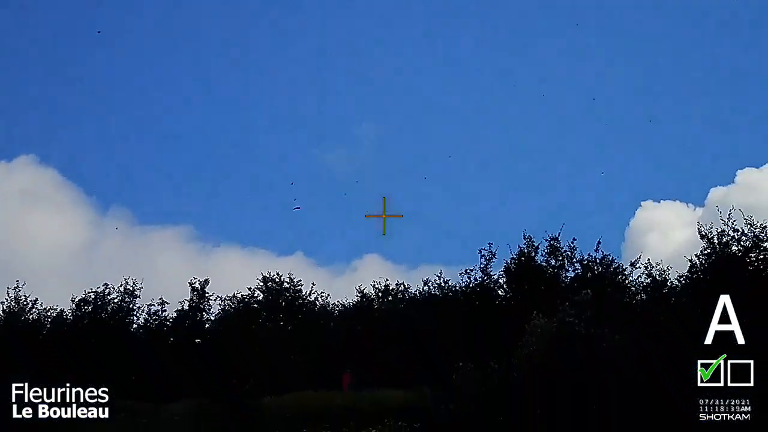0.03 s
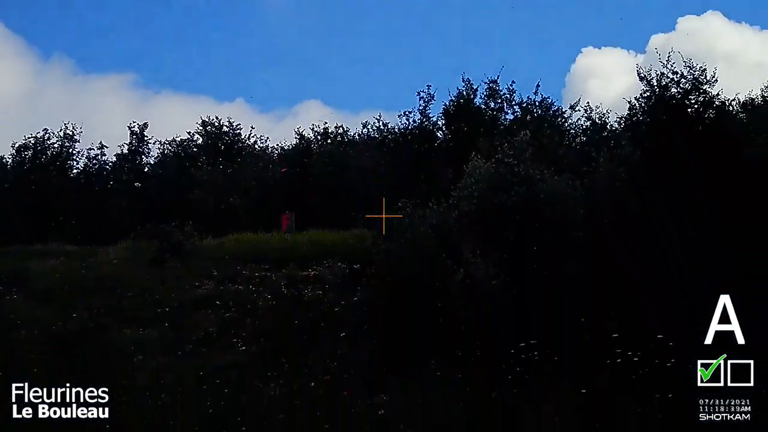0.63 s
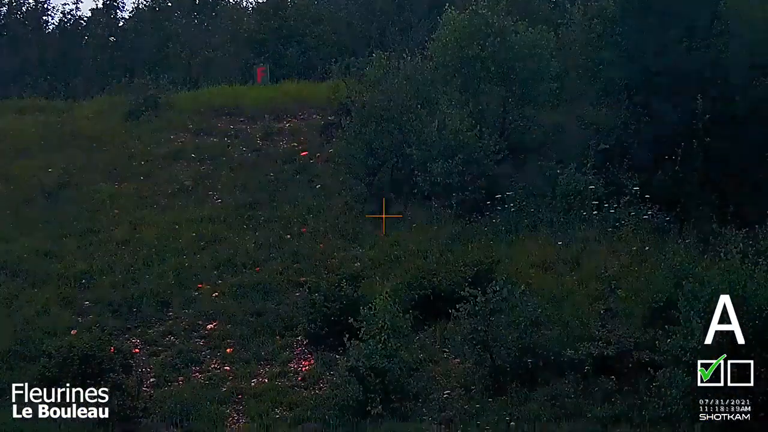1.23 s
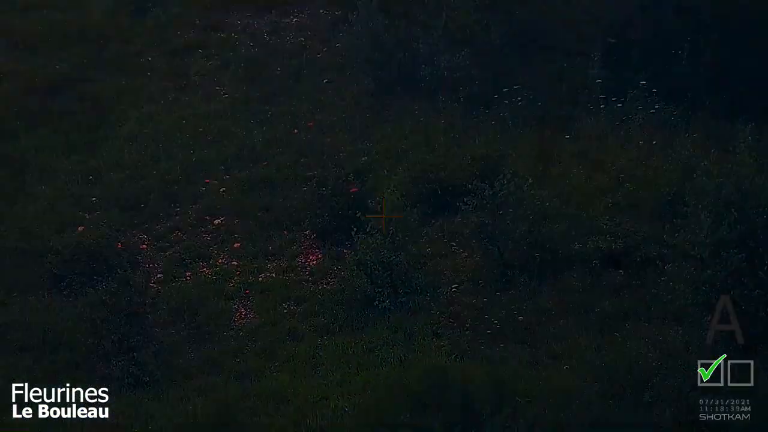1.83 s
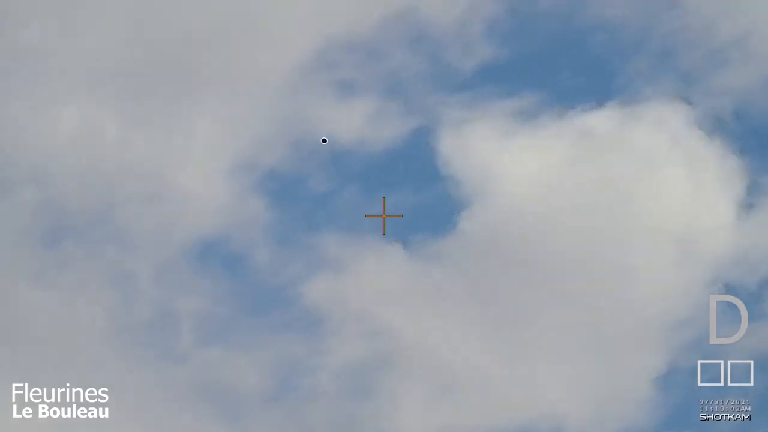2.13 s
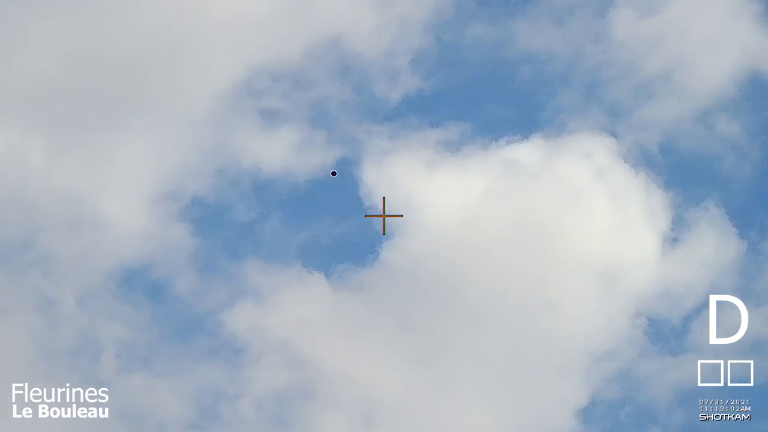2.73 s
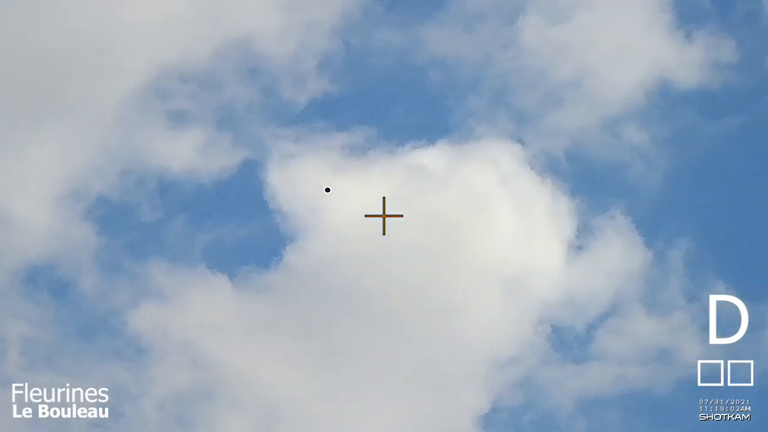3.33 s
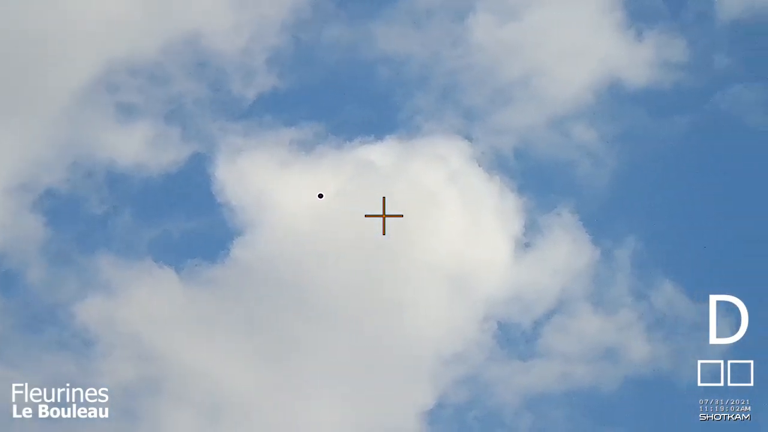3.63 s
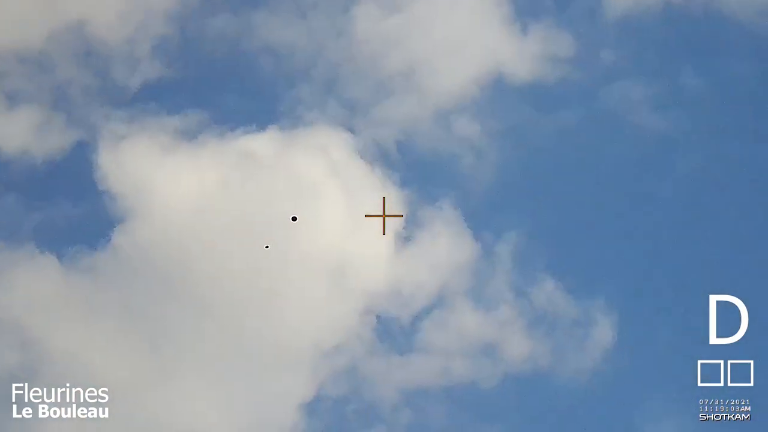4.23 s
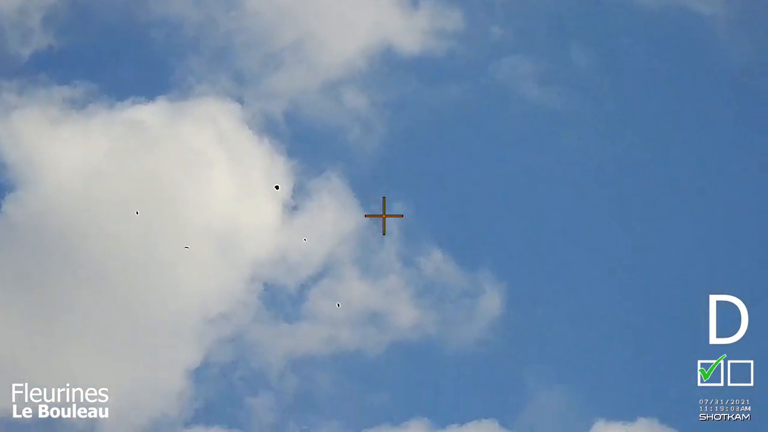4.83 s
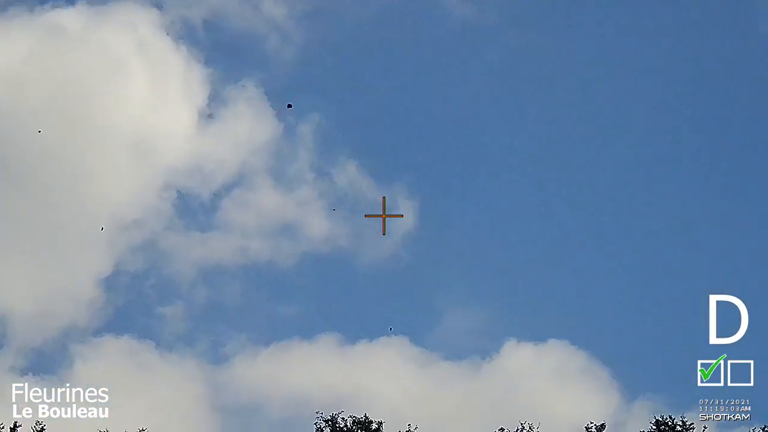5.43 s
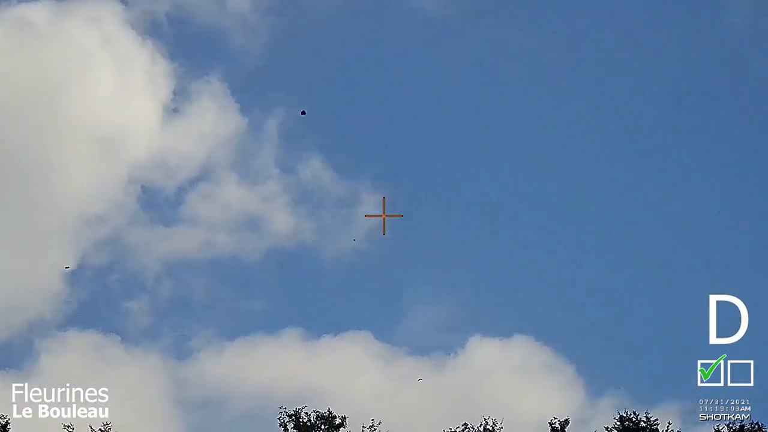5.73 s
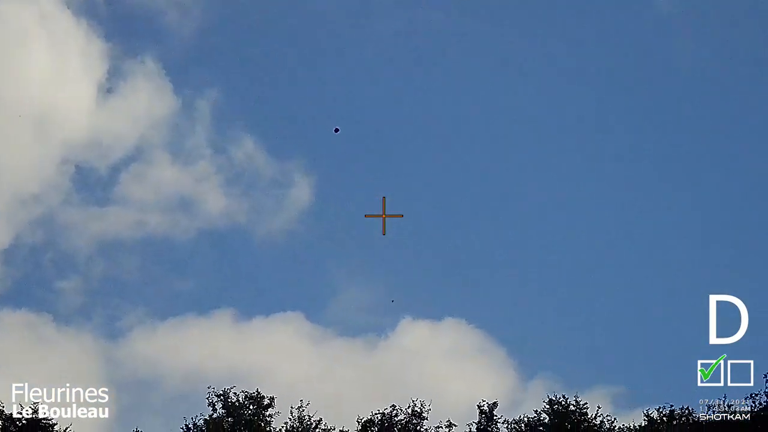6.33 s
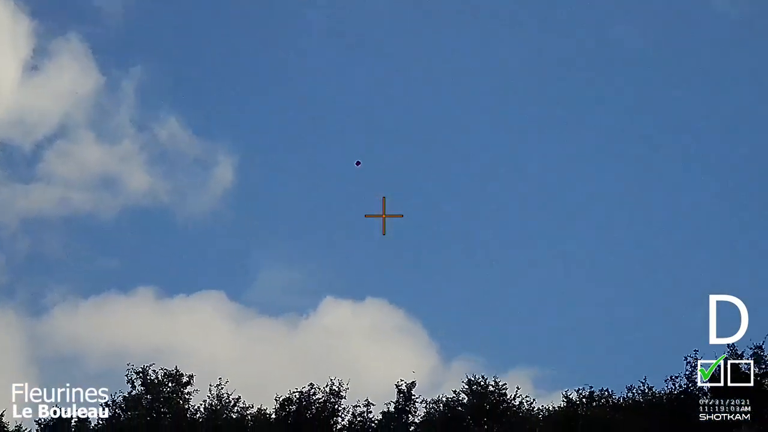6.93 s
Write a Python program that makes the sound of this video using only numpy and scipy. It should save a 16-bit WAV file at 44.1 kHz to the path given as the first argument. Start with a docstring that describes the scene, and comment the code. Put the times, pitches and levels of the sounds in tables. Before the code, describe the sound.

A single shotgun shot is heard from a small microphone mounted on the gun at an open-air range. At first there is only a soft, dying rumble from a previous shot and light hiss. Then the blast hits, harsh and overloaded, cutting the sound out for an instant. A low, tube-like boom follows, swelling with echoes from the hillsides and tree line before sinking back into faint wind.

```python
"""A clay range among wooded slopes: one shotgun shot, heard by a small microphone under the barrel.
Over faint wind and hiss, the report of an earlier shot fades until the sound drops out briefly.
Hands grip the stock and the steel action rings; then blast and recoil drive the microphone between
its limits and choke it for a moment. The report rolls back as reverberation from the slopes and
echoes from the trees, coloured by the resonances of the air column in the barrel."""
import sys
import numpy as np
from scipy import signal
from scipy.fft import rfft, irfft
from scipy.io import wavfile
from scipy.ndimage import uniform_filter1d

SR = 44100
rng = np.random.default_rng(int(sys.argv[2]) if len(sys.argv) > 2 else 0)


def unload_audio(sound):
    """Save the sound as a 16-bit wav file, at the path given as the first command line argument."""
    columns = np.transpose(np.atleast_2d(sound))
    # keep every value between -1 and 1, then stretch to whole-number steps
    steps = np.round(np.clip(columns, -1, 1) * 32767)
    wavfile.write(sys.argv[1], SR, steps.astype(np.int16))


N = 308700
T = np.arange(N) / SR

# the charge fires, the blast arrives, suction follows, the microphone comes free
FIRE_S, BLAST_S, SUCTION_S, RECOVER_S = 3.839, 3.851, 3.9074, 4.018
DROPOUT_START_S, DROPOUT_END_S = 1.844, 1.909
LIMIT = .69   # amplitude at which the microphone saturates

# spectrum of the steady hiss: f/Hz, relative level/dB
HISS_SPECTRUM = [(120, -30), (200, -4), (431, -5), (476, -6), (711, -6.5), (827, -8.5), (961, -9.5),
                 (5830, -13.5), (8700, -17.5), (10800, -37.5), (14100, -74.5), (22000, -120)]
# modes of the air column in the barrel: f/Hz, bandwidth/Hz, relative level/dB
BARREL_MODES = [(178.96, 18, 7), (552, 78, -7), (617, 28, -10.5), (1083, 52, -19), (1620, 220, -28.5),
                (2110, 130, -27.5), (2970, 320, -30.5), (3813, 950, -33.5), (5200, 1800, -36.5)]
# broad returns from single slopes: t/s, half width/s, boom lift/dB, roar lift/dB
SLOPE_RETURNS = [(0.21, 0.031, 1.5, 4), (0.34, 0.036, 6, 4), (0.74, 0.19, 5, 3.5), (1.3, 0.34, 4, 1),
                 (4.062, 0.032, 6, 0.5), (4.155, .024, 8.5, 0), (4.421, 0.049, 12, 2.5),
                 (4.615, .035, 10, 1.5), (5.115, 0.046, 4, -2), (5.15, 0.18, 3.5, 5.5), (5.97, 0.041, 8, 2)]
# echoes from the tree line: t/s, hold/s, decay/s, then relative level/dB of thump, knock and crack
TREE_ECHOES = [(4.4102, 0.0051, 0.0081, -40, -42.5, -33.5), (4.435, 0.0028, 0.01, -40, -50, -43.5),
               (4.448, 0.019, 0.007, -68, -61.5, -49.5), (4.5401, 0.0058, 0.0034, -56, -42.5, -42)]
# modes of the steel action: onset t/s, f/Hz, level/dB re the limit
ACTION_MODES = [(3.8432, 1500, -23), (3.8448, 3100, -14), (3.8474, 1250, -1.5)]
# recoil jolts on the microphone: t/s, duration/s, edge/s, rattle (0-1)
RECOIL_JOLTS = [(3.8568, .0020, .00007, .55), (3.8638, .0009, .00007, .55), (3.8656, .00012, .00006, 0),
                (3.8739, .0015, .00014, 0), (3.8910, .0026, .00015, 0), (3.8960, .0030, .0001, 0)]


def from_db(db):
    """Amplitude ratio of a level in decibels."""
    return 10 ** (np.asarray(db) / 20)


def unit_rms(x):
    """Normalisation to unit rms."""
    return x / np.sqrt(np.mean(x ** 2) + 1e-20)


def evened(x, span_s):
    """Division by the running rms takes the chance swells out of noise."""
    return x / np.sqrt(np.abs(uniform_filter1d(x * x, max(int(span_s * SR), 8))) + 1e-12)


def butter(x, hz, kind, order=2):
    """Causal Butterworth filter."""
    sections = signal.butter(order, np.clip(hz, 10, .45 * SR), kind, fs=SR, output="sos")
    return signal.sosfilt(sections, x + 1e-18)


def noise():
    """White Gaussian noise of unit rms."""
    return rng.standard_normal(N)


def coloured(spectrum):
    """Spectral shaping of noise by rows of f/Hz, relative level/dB; unit rms."""
    hz, db = np.transpose(spectrum)
    bin_hz = np.maximum(np.arange(N // 2 + 1) * SR / N, 1)
    gain = from_db(np.interp(np.log(bin_hz), np.log(hz), db))
    return unit_rms(irfft(rfft(noise()) * gain, N))


def burst(start_s, hold_s, decay_s):
    """Envelope that holds, then decays exponentially."""
    return (T >= start_s) * np.exp(-np.maximum(T - start_s - hold_s, 0) / decay_s)


def barrel_resonance(x):
    """Air-column resonance: each mode is a damped resonator; white noise keeps about its level."""
    ringing, power = 0, 0
    for hz, width_hz, db in BARREL_MODES:
        radius = np.exp(-np.pi * width_hz / SR)
        gain = from_db(db) * (1 - radius ** 2) / 2
        feedback = [1, -2 * radius * np.cos(2 * np.pi * hz / SR), radius ** 2]
        ringing = ringing + signal.lfilter([gain, 0, -gain], feedback, x + 1e-18)
        power += from_db(db) * gain
    return ringing / np.sqrt(power)


def background(wind_db=-63.5, wind_hz=26, gust_db=1.5, hiss_db=-69, hum_db=-86):
    """Turbulent wind buffets the microphone port, over even hiss and the barrel's resonant hum."""
    gusts = from_db(gust_db * coloured([(1, 0), (6, 0), (20, -40), (60, -120)]))
    buffets = butter(noise(), wind_hz, "low", order=1)
    wind = from_db(wind_db) * gusts * unit_rms(butter(buffets, 300, "low"))
    hiss = from_db(hiss_db) * coloured(HISS_SPECTRUM)
    return wind + hiss + from_db(hum_db) * barrel_resonance(noise())


def grip(start_s=3.75, level_db=-59.5, top_hz=160):
    """Structure-borne sound: the hands tighten on the stock just before the shot."""
    return from_db(level_db) * burst(start_s, .04, .03) * unit_rms(butter(noise(), top_hz, "low"))


def report_decay(start_db, db_per_decade, knee_s=1.0, earlier_shot_ago_s=1.95):
    """Power-law decay in dB: the earlier report until the drop-out, this one after the choke."""
    age_s = np.where(T < FIRE_S, T + earlier_shot_ago_s, T - FIRE_S)
    heard = (T < DROPOUT_START_S) | (T > RECOVER_S)
    return np.where(heard, start_db + db_per_decade * np.log10(1 + age_s / knee_s), -np.inf)


def report_envelopes(opening_s=.0026):
    """Reflection from single slopes swells the decaying boom (bass) and roar (midrange)."""
    boom_db = report_decay(start_db=-34.5, db_per_decade=-65)
    roar_db = report_decay(start_db=-29, db_per_decade=-80)
    for peak_s, width_s, boom_lift_db, roar_lift_db in SLOPE_RETURNS:
        bell = np.exp(-((T - peak_s) / width_s) ** 2)
        boom_db += boom_lift_db * bell
        roar_db += roar_lift_db * bell
    opening = 1 - burst(RECOVER_S, 0, opening_s)   # the choked microphone comes free
    return opening * from_db(boom_db), opening * from_db(roar_db)


def rolling_report(air_db_per_octave=-13.5, air_hz=1300, top_hz=5900, rumble_db=-3, rumble_hz=70):
    """Reverberation from the slopes: air absorption takes more treble from later reflections."""
    boom, roar = report_envelopes()
    # the barrel's lowest mode picks out the bass
    drone = boom * evened(barrel_resonance(butter(noise(), [115, 260], "band")), span_s=.24)
    # absorption reaches its full slope one second after the choke
    absorption = np.sqrt(np.where(T < FIRE_S, 1, np.clip(T - RECOVER_S, 0, 1)))
    field, edges_hz = 0, np.geomspace(400, 9000, 8)
    for low, high in zip(edges_hz, edges_hz[1:]):
        octaves = max(np.log2(np.sqrt(low * high) / air_hz), 0)
        air_gain = from_db(air_db_per_octave * absorption * octaves)
        field = field + roar * air_gain * butter(noise(), [low, high], "band")
    rumble = boom * from_db(rumble_db) * unit_rms(butter(noise(), rumble_hz, "low"))
    rumble *= burst(RECOVER_S, .55, .16)
    return drone + butter(barrel_resonance(field), top_hz, "low", order=6) + rumble


def tree_echoes(thump_hz=240, knock_hz=(520, 760), crack_hz=(1050, 1420), top_hz=3500,
                edge_db=-10.5, direct_db=-11, rise_s=.0015):
    """Scattering by banks of trees returns smeared echoes of the shot, partly through the barrel."""
    thump = evened(butter(noise(), thump_hz, "low"), span_s=.014)
    knock = evened(butter(noise(), knock_hz, "band", order=3), span_s=.005)
    crack = evened(butter(noise(), crack_hz, "band", order=4), span_s=.0086)
    crack += from_db(edge_db) * unit_rms(butter(noise(), [crack_hz[1], top_hz], "band"))
    echoes = 0
    for start_s, hold_s, decay_s, thump_db, knock_db, crack_db in TREE_ECHOES:
        envelope = burst(start_s, hold_s, decay_s) * (1 - burst(start_s, 0, rise_s))
        colour = from_db(thump_db) * thump + from_db(knock_db) * knock + from_db(crack_db) * crack
        echoes = echoes + envelope * colour
    return butter(barrel_resonance(echoes) + from_db(direct_db) * echoes, top_hz, "low", order=8)


def firing(roughness=.39, push=.22):
    """Reaction shoves the gun; the action's modes ring in one by one as the charge runs up the barrel."""
    shove = np.sin(np.pi * np.clip(2 * (T - FIRE_S) / (BLAST_S - FIRE_S), 0, 1)) ** 2
    grit = 1 + roughness * unit_rms(butter(noise(), 3000, "low"))
    steel = sum(from_db(db) * np.sin(2 * np.pi * hz * np.maximum(T - onset_s, 0))
                for onset_s, hz, db in ACTION_MODES)
    return push * shove + steel * grit * (T < BLAST_S)


def recoil(pressure, rattle_hz=(1000, 4000), shake=2.5):
    """Inertia pulls the diaphragm against the blast pressure at each jolt; the first rattle the mount."""
    vibration = evened(butter(noise(), rattle_hz, "band"), span_s=.0053)
    chatter = np.maximum(shake * vibration - 1, 0)
    for start_s, length_s, edge_s, rattle in RECOIL_JOLTS:
        outside = np.maximum(start_s - T, T - start_s - length_s) / edge_s   # negative within the jolt
        pull = np.tanh(2 * outside) + rattle * chatter
        pressure = np.where(outside < 2, np.minimum(pressure, pull), pressure)
    return pressure


def blast(overload=5.0, swing_s=.0004, relax_s=.071):
    """Blast wave, in units of the limit: overpressure, then suction from which the microphone relaxes."""
    swing = np.clip((SUCTION_S - T) / swing_s, -overload, overload) * (T >= BLAST_S)
    relaxation = np.exp(np.minimum((RECOVER_S - T) / relax_s, 2))
    return np.maximum(swing, -relaxation)


def scene():
    """Superposition of the shot, its reflections and the quiet sounds, in one channel."""
    shot = LIMIT * (firing() + recoil(blast()))
    return (shot + rolling_report() + tree_echoes() + grip() + background())[None]


def record(dry, coupling_s=.1, soft_hz=7200, cutoff_hz=10400):
    """Saturation clips the microphone, its coupling lets held pressure sag, the next stage clips again."""
    leak = np.exp(-1 / (coupling_s * SR))
    sagging = signal.lfilter([1, -1], [1, -leak], np.clip(dry, -LIMIT, LIMIT))
    softened = butter(np.clip(sagging, -LIMIT, LIMIT), soft_hz, "low", order=3)
    # the sound drops out briefly before the shot
    live = (T < DROPOUT_START_S) | (T > DROPOUT_END_S)
    interrupted = np.interp(T, T[live], softened[0, live])[None]
    return signal.sosfilt(signal.ellip(8, .1, 70, cutoff_hz, fs=SR, output="sos"), interrupted)


dry = scene()
out = record(dry)
unload_audio(out)
```